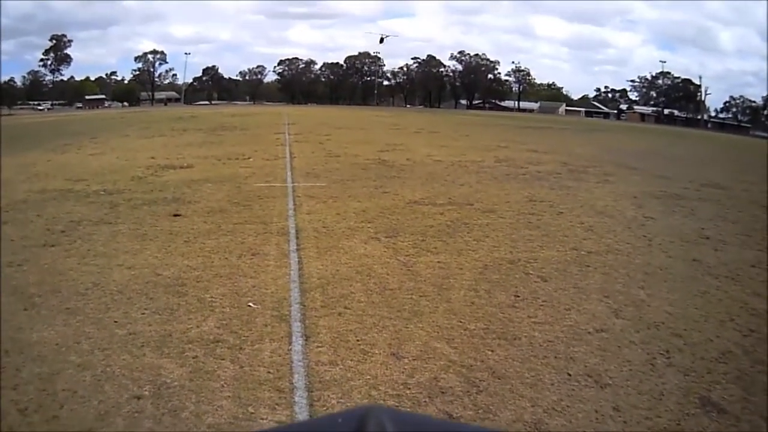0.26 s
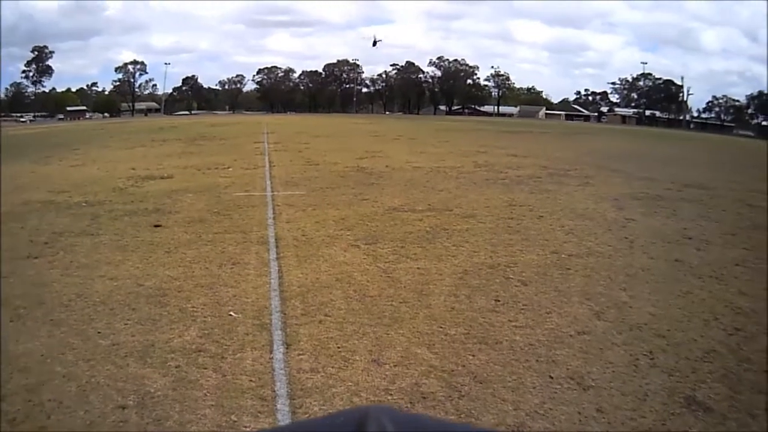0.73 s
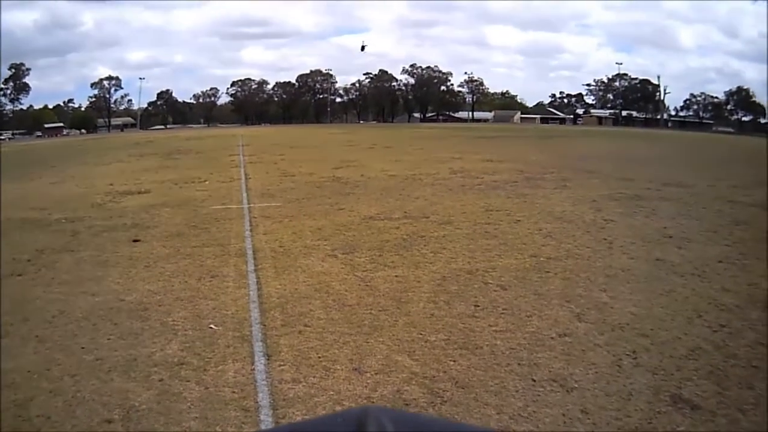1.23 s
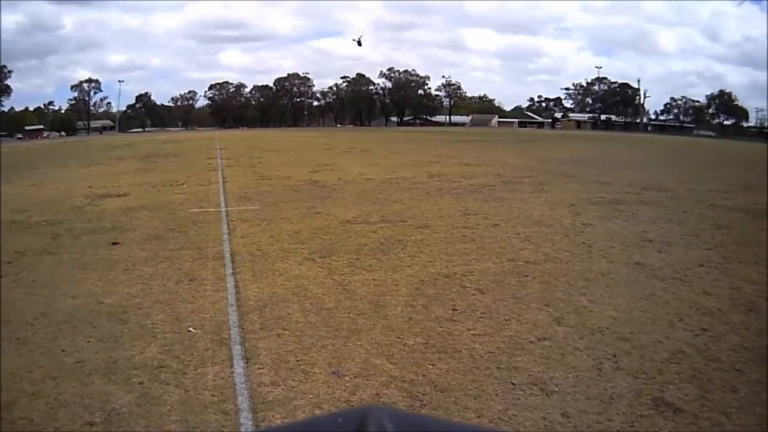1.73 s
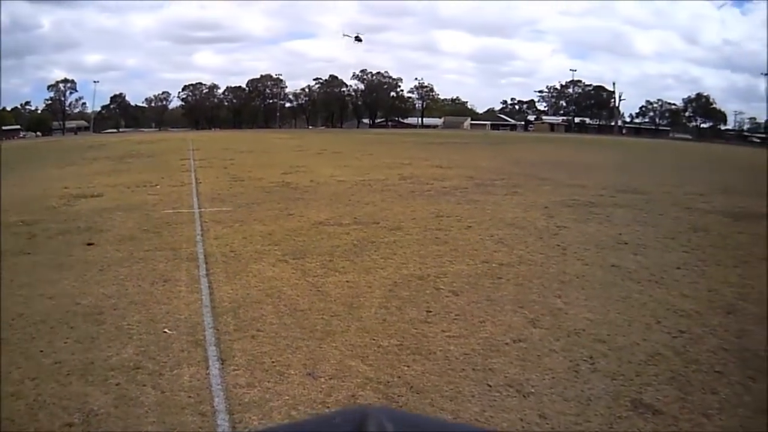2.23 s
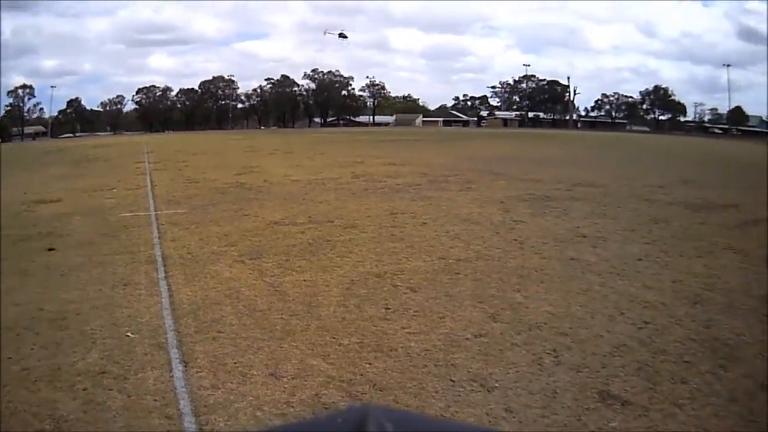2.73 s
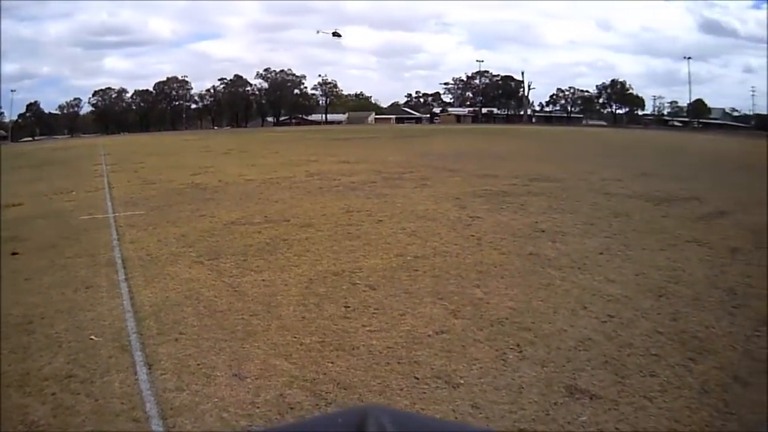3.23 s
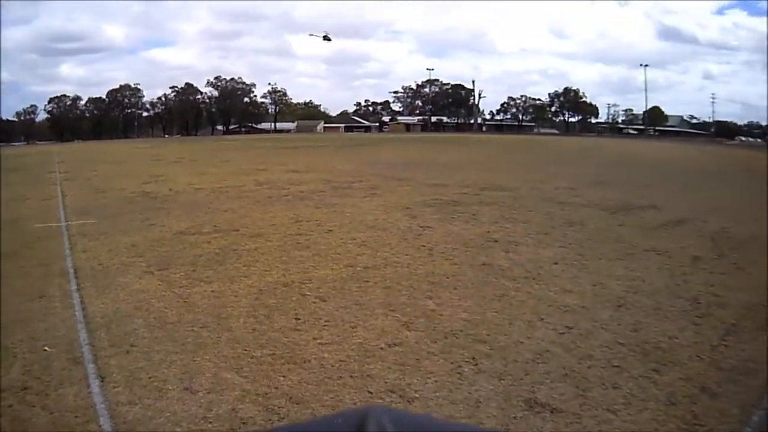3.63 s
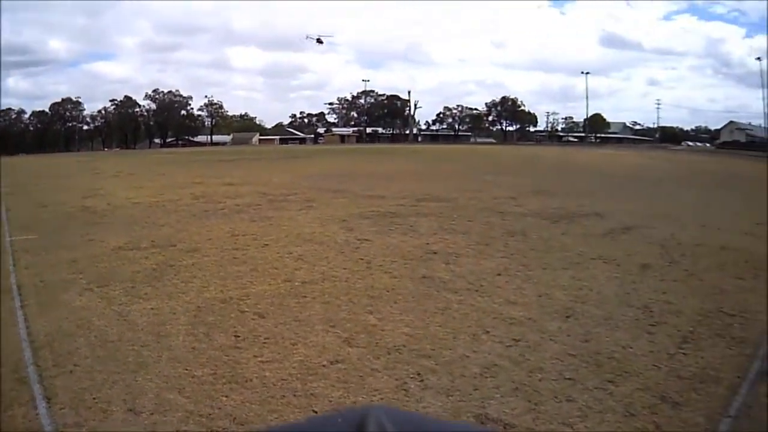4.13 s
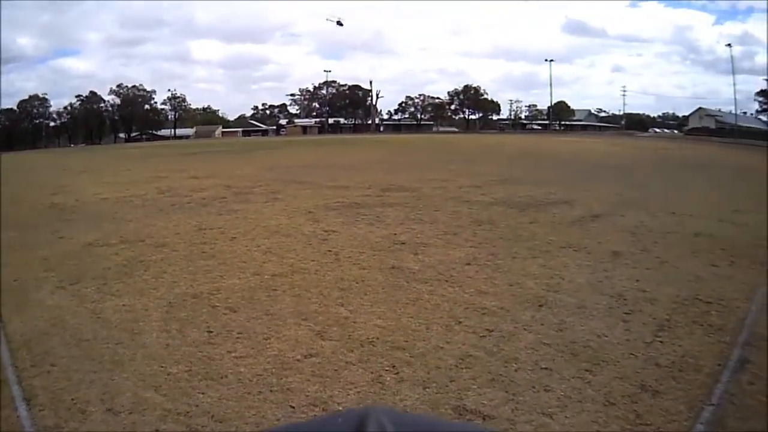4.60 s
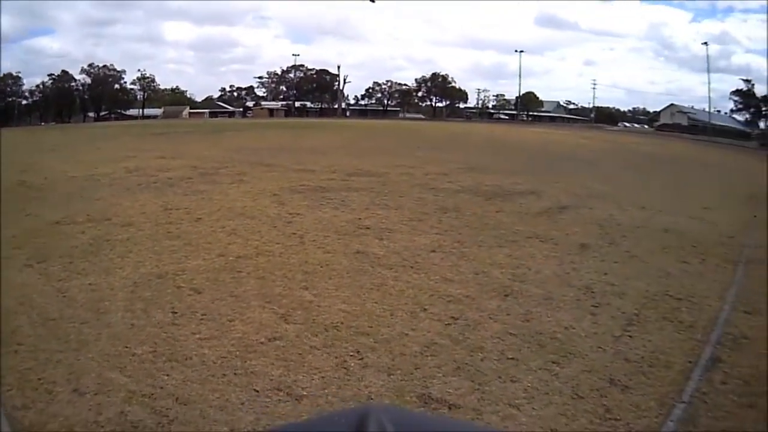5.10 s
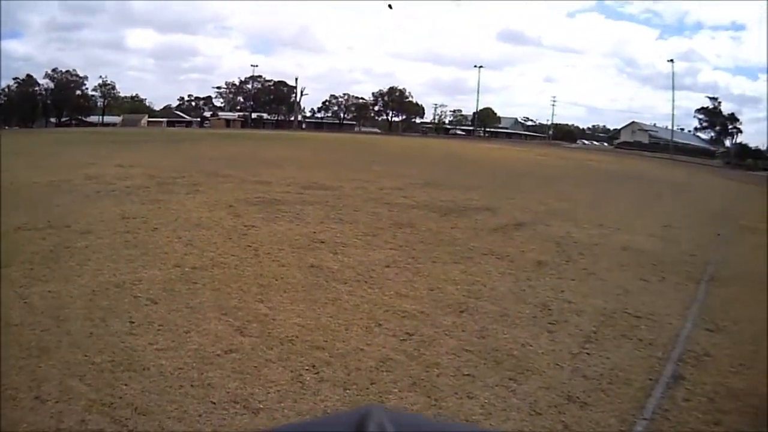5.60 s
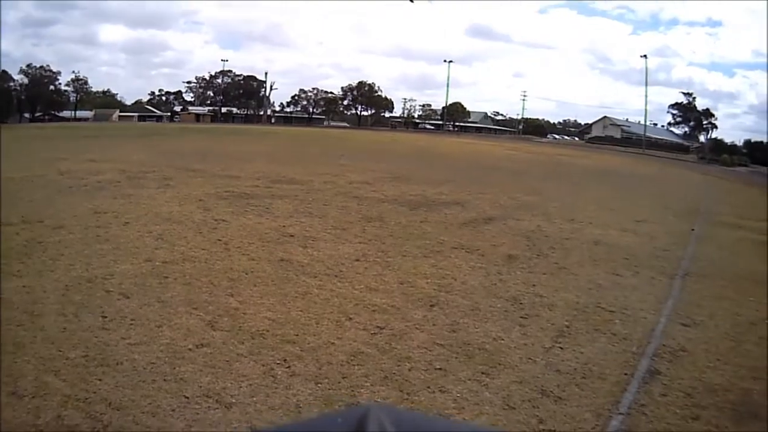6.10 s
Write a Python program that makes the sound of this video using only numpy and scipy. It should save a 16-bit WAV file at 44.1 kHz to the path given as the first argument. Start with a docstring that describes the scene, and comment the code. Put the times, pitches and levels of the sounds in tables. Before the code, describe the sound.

Close model helicopter drive whining high and gritty with a fast flutter, under heavy low wind thumps that thin out toward the end.

```python
"""Model helicopter over an open field

Gusts buffet the microphone: bands of noise follow the gusts, which differ in strength and brightness.
A small geared electric drive whines and rasps: tones and noise follow the phase of a shaft that turns
about seventeen times a second, and the noise swells once a turn. Two blades add pulses of hiss at each turn.
Behind them lie the rotor's swish, a noise band of wandering centre, and the soft rush of the field."""
import sys
import numpy as np
from scipy import signal
from scipy.fft import rfft, irfft, next_fast_len
from scipy.io import wavfile
from scipy.ndimage import uniform_filter1d

SR = 44100
rng = np.random.default_rng(int(sys.argv[2]) if len(sys.argv) > 2 else 0)


def output_pcm(signal):
    """Save a mono or channel-first signal as 16-bit PCM at the path in sys.argv[1].

    Samples are clipped to [-1, 1] before scaling.
    """
    pcm = np.clip(np.atleast_2d(signal).T, -1, 1) * 32767
    wavfile.write(sys.argv[1], SR, np.round(pcm).astype(np.int16))


N = 280035

# Open air. Each row: time in seconds, relative level in dB.
AIR_LEVEL = [(0.0, -45.5), (0.6, -46.5), (1.5, -41), (2.4, -43), (3.2, -40.5), (5.2, -40), (6.35, -43)]
# Colour of the open air. Each row: frequency in Hz, relative density in dB per Hz.
AIR_COLOUR = [(380, -14), (520, -2.5), (760, 0), (870, 2), (1100, -0.5), (1900, -0.5), (2400, -4),
              (2800, -9.5), (3100, -12), (3700, -12), (5000, -33)]

# Swish of the distant rotor. Each row: time in seconds, centre frequency in Hz, level in dB.
SWISH = [(0, 1500, -54), (1.3, 1241, -43), (1.8, 1485, -51), (2.3, 1936, -50), (3.3, 1800, -49),
         (4.0, 1728, -65), (4.8, 1158, -46), (5.6, 1080, -50), (6.35, 1193, -53)]

# Gusts on the microphone. Each row: start in seconds, hold in seconds, relative level in dB,
# brightness in dB per octave.
GUSTS = [(-0.07, 0.48, -24.5, -2.1), (0.53, 0.15, -27.5, -2), (0.757, 0.19, -23.5, -3),
         (1.05, 0.17, -29, -1.2), (1.213, 0.28, -27, -4), (1.738, 0.31, -27, -4), (2.138, 0.2, -22.5, -1.5),
         (2.462, 0.19, -29, -3), (2.908, 0.41, -23.5, -5.5), (3.466, 0.12, -25, -5.5),
         (3.643, 0.56, -21.5, -4.5), (4.227, 0.16, -30, -8), (4.79, 0.13, -27.5, -9.5),
         (5.055, 0.083, -26, -7.5), (5.292, 0.011, -28, -6), (5.382, 0.03, -37.5, -14.5),
         (5.567, 0.04, -33.5, -11.5), (5.755, 0.018, -33, -8)]
# Colour of the wind. Each row: frequency in Hz, density in dB per Hz against the level of the gust.
WIND_COLOUR = [(20, -13), (45, -19.5), (80, -20.5), (120, -19.5), (190, -21), (270, -22.5), (370, -24.5),
               (520, -30.5), (800, -37.5), (1200, -43.5), (2000, -50), (3000, -82)]
GUST_ATTACK_S, GUST_RELEASE_S = 0.063, 0.11
# The breeze between the gusts is weak and dull.
BREEZE_DB, BREEZE_DB_PER_OCTAVE = -40, -11.4
# Brightness tilts the wind about a pivot, between a low and a high corner.
TILT_LOW_HZ, TILT_PIVOT_HZ, TILT_HIGH_HZ = 61, 156.4, 375

# Spells in which the blades bite harder. Each row: start in seconds, hold in seconds, level in dB.
BITES = [(3.4, 1.15, -59)]
# Hiss of the blade tips. Each row: frequency in Hz, relative density in dB per Hz.
BLADE_HISS = [(9000, -2), (11000, 3), (12000, -3), (13800, 0), (15500, -9)]
BLADE_BASE_DB = -61.5
BLADE_PLACE, BLADE_WIDTH = -.13, 0.063   # place of the first blade and width of each pass, in turns

# Thin squeaks. Each row: centre in seconds, frequency in Hz, Gaussian spread in seconds, peak level in dB.
SQUEAKS = [(5.39, 5950, .006, -50), (5.42, 5980, 0.0052, -51), (5.458, 5900, 0.006, -42.5)]

# Rotation of the drive. Each row: time in seconds, speed in turns per second.
SPEED = [(0.0, 16.82), (0.85, 17.0), (1.67, 16.9), (2.15, 17.05), (3.0, 17.0), (3.6, 16.78), (4.0, 16.79),
         (4.34, 16.92), (5.1, 16.91), (5.9, 16.63), (6.35, 16.77)]
START_TURN = .13   # phase at the start, in turns
# Effort of the gear train. Each row: time in seconds, relative level of the rasp in dB.
EFFORT = [(0, -48.5), (1.0, -47.5), (1.5, -49), (2.05, -45), (2.7, -46.5), (3.25, -44), (3.8, -47.5),
          (4.75, -45), (5.5, -47), (6.35, -50.5)]
# Song of the main mesh. Each row: time in seconds, relative level in dB.
WHINE_LEVEL = [(0, -40), (1.0, -39), (1.8, -42), (2.03, -53), (2.55, -43), (2.95, -47), (3.5, -48),
               (3.75, -41), (4.7, -44), (5.15, -54), (6.35, -51)]
# Low hum of the turning parts. Each row: multiple of the turn, level in dB.
HUM = [(6, -33), (18.75, -48), (43.7, -59), (48.2, -60), (50, -55.5), (52.7, -62)]
# Catches of each turn. Each row: place in turns, width in turns, relative whine when light in dB,
# relative whine when loaded in dB, relative grind in dB.
CATCHES = [(-.36, 0.06, 5, -1, 3), (-.11, 0.061, 5, 6, 7), (.03, 0.045, -14, 2.5, 2),
           (.14, .055, 2, -15, -30), (.37, 0.031, -2, 7, 8)]
# Gear rasp through the housing. Each row: frequency in Hz, relative density in dB per Hz.
RASP_COLOUR = [(2300, -15), (2750, -11), (3050, -18), (3550, -20), (3750, -13), (4050, -2.5), (4300, -1),
               (4950, -3.5), (5220, -6.5), (5600, -1), (5950, -12), (6200, -14), (6500, -15), (6850, -10),
               (7500, -21)]
# Fine sizzle of the teeth. Each row: frequency in Hz, relative density in dB per Hz.
SIZZLE_COLOUR = [(7800, -5), (8200, -4), (8900, -4.5), (9700, -3), (10500, 4), (11000, 5), (11350, -8),
                 (11650, -22), (12600, -11), (13800, -9), (15500, -19)]
# Bright spit of each catch. Each row: frequency in Hz, relative density in dB per Hz.
SPIT_COLOUR = [(8100, 5.5), (8800, 1), (11000, 8), (11800, -2), (13200, -9), (15500, -18)]
# Spells of stronger sizzle. Each row: start in seconds, hold in seconds, relative level in dB.
FLARES = [(3.38, .05, -47), (3.64, .1, -46)]
# Spells in which the teeth grind. Each row: start in seconds, hold in seconds, relative level in dB.
GRINDS = [(2.0, .8, -53.5), (4.3, 0.95, -56.5), (5.9, .45, -63)]
# Tones of the grinding. Each row: multiple of the turn, relative level in dB.
GRIND_TONES = [(156, -1.5), (163, 3), (483, -6), (492, -4)]
# Tones of the squealing wheel. Each row: multiple of the turn, relative level in dB.
SQUEAL_TONES = [(226, -15), (234, -0.5), (253, -15), (259, -19), (283, -8)]
# Side tones of the train. Each row: multiple of the turn, mean level in dB against the effort.
SIDE_TONES = [(199, -14.5), (283, -20), (350, -16.5), (399, -16.5), (445, -24), (749, -25)]

MESH_TEETH = 324   # main-mesh cycles per turn
# The gears come under load and later run free again.
LOAD_START_S, LOAD_HOLD_S, LOAD_ATTACK_S, LOAD_RELEASE_S = 2.07, 2.1, .45, 0.51
THROB_FREE_DB, THROB_LOADED_DB = 1.5, 2.5   # swell of the rasp in each turn, up and down from the middle
# Relative level of the sizzle, which fades a little as the flight goes on.
SIZZLE_DB, SIZZLE_FADE_DB_PER_S = -46.5, 0.41
GRIND_BASE_DB = -61.5
SPELL_ATTACK_S, SPELL_RELEASE_S = 0.061, 0.049   # for sizzle, grinding and blades
# One wheel squeals for a while; the weak squeal around it follows the effort of the gears.
SQUEAL_START_S, SQUEAL_HOLD_S, SQUEAL_ATTACK_S, SQUEAL_RELEASE_S = 2.895, 0.29, 0.29, 0.38
SQUEAL_DB, SQUEAL_BASE_DB = -41.5, -56   # relative levels, the base at the greatest effort

# During the strongest gust the drive and the field dip briefly.
DIP_START_S, DIP_HOLD_S, DIP_EDGE_S = 3.88, 0.31, 0.098
DRIVE_DIP_DB, AIR_DIP_DB = -1.5, -5
CUTOFF_HZ = 15700


def from_db(db):
    """Amplitude grows tenfold for every 20 dB."""
    return np.exp(np.asarray(db) * np.log(10) / 20)


def rms_one(x):
    """Division by the root mean square normalizes the power."""
    return x / np.sqrt(np.mean(x ** 2) + 1e-20)


def in_time(rows):
    """Linear interpolation gives each column of a curve sample by sample."""
    seconds, *columns = np.transpose(rows)
    return [np.interp(np.arange(N) / SR, seconds, column) for column in columns]


def at_hz(points, hz):
    """A spectrum is interpolated in dB along a log-frequency axis."""
    known_hz, db = np.transpose(points)
    return np.interp(np.log(hz), np.log(known_hz), db)


def drift(rate_hz):
    """Low-pass noise: two equal poles leave a slow random motion of spread 1."""
    step = 40   # samples between computed points
    pole = np.exp(-2 * np.pi * rate_hz * step / SR)
    white = rng.standard_normal(N // step + 2002)
    slow = signal.lfilter([1], [1, -2 * pole, pole * pole], white)[2000:]   # settled part only
    return np.interp(np.arange(N) / step, np.arange(len(slow)), rms_one(slow))


def hiss(colour):
    """Spectral shaping: white noise takes a given colour and dies away beyond its ends; rms 1."""
    size = next_fast_len(N)
    hz = np.maximum(np.arange(size // 2 + 1) * SR / size, 1)
    low_skirt = np.minimum(hz / colour[0][0], 1) ** 8
    high_skirt = np.minimum(colour[-1][0] / hz, 1) ** 24
    spectrum = rfft(rng.standard_normal(size)) * from_db(at_hz(colour, hz))
    return rms_one(irfft(spectrum * low_skirt * high_skirt, size)[:N])


def envelope(start, hold, attack, release):
    """Exponential growth and decay: the gain swells to 1, holds and dies away."""
    t = np.arange(N) / SR
    before = np.maximum(start - t, 0)
    after = np.maximum(t - start - hold, 0)
    return np.exp(-before / attack - after / release)


def spells(rows, base_db):
    """Powers of independent sounds add: stronger spells lie on top of a base level."""
    power = from_db(base_db) ** 2
    for start, hold, db in rows:
        power = power + (from_db(db) * envelope(start, hold, SPELL_ATTACK_S, SPELL_RELEASE_S)) ** 2
    return np.sqrt(power)


def rotation():
    """Phase is the integral of speed: the turns per second and the turns made."""
    speed, = in_time(SPEED)
    return speed, START_TURN + np.cumsum(speed) / SR


def bump(turn, place, width):
    """Periodic contact: a brief Gaussian pulse at one place of every turn."""
    distance = (turn - place + .5) % 1 - .5
    return np.exp(-.5 * (distance / width) ** 2)


def swell(turn, depth_db):
    """Eccentricity: off-centre gears press hardest once a turn; rms about 1."""
    gain = from_db(depth_db * np.cos(2 * np.pi * turn))
    return gain / np.sqrt(np.i0(2 * np.log(from_db(depth_db))))


def evened(gain, speed):
    """A running mean of power keeps a pattern at rms 1 over every two turns or so."""
    two_turns = int(2 * SR / speed.mean())
    return gain / np.sqrt(uniform_filter1d(gain ** 2, two_turns) + 1e-12)


def tone(turn, multiple, jitter, jitter_rate):
    """Phase modulation: play in the teeth shakes a tone locked to the turn, jitter in radians; rms 1."""
    phase = 2 * np.pi * multiple * turn + jitter * drift(jitter_rate)
    return np.sqrt(2) * np.sin(phase)


def air(level_db=1.5):
    """Broadband ambience: the field is a soft rush of coloured noise that flickers slightly."""
    air_db, = in_time(AIR_LEVEL)
    return from_db(air_db + level_db + 1.38 * drift(36)) * hiss(AIR_COLOUR)


def rotor_swish(width_hz=130):
    """Quadrature modulation: the far blades are a band of noise whose centre wanders."""
    centre_hz, db = in_time(SWISH)
    angle = 2 * np.pi * np.cumsum(centre_hz) / SR
    return from_db(db) * (drift(width_hz) * np.cos(angle) + drift(width_hz) * np.sin(angle))


def wind(eddy_db=1.5, eddy_rate=25, patchy_db=1.5, steady_s=0.138):
    """Turbulence breaks on the microphone: the breeze only rumbles, gusts add smaller, brighter eddies."""
    gust_power = np.array([envelope(start, hold, GUST_ATTACK_S, GUST_RELEASE_S) ** 2
                           for start, hold, *_ in GUSTS])
    gust_db, brightness = np.transpose(GUSTS)[2:]
    edges = 14 * 2 ** np.arange(0, 8, .5)   # half-octave bands, in Hz
    white, eddies, out = rng.standard_normal((2, N + SR)), drift(eddy_rate), 0
    for k, (low, high) in enumerate(zip(edges, edges[1:])):
        hz = np.sqrt(low * high)
        band_filter = signal.butter(2, [low, high], "band", fs=SR, output="sos")
        band = signal.sosfilt(band_filter, white[k % 2])[SR:]
        # Evened power lets the breeze, gusts and lumps below set the slow level.
        band = band / np.sqrt(uniform_filter1d(band ** 2, int(steady_s * SR)) + 1e-12)
        octaves = np.log2(np.clip(hz, TILT_LOW_HZ, TILT_HIGH_HZ) / TILT_PIVOT_HZ)
        breeze = from_db(BREEZE_DB + BREEZE_DB_PER_OCTAVE * octaves) ** 2
        gusts = from_db(gust_db + brightness * octaves) ** 2 @ gust_power
        # Small eddies come in bursts.
        lumps_db = eddy_db * min(hz / 400, 1) * eddies + patchy_db * drift(15.0)
        strength = np.sqrt((breeze + gusts) * (high - low))
        out = out + band * strength * from_db(at_hz(WIND_COLOUR, hz) + lumps_db)
    return out


def blades(uneven_db=1.5, uneven_rate=60):
    """Amplitude modulation by passing: each of the two blades gives a short, uneven hiss once a turn."""
    _, turn = rotation()
    passes = bump(turn, BLADE_PLACE, BLADE_WIDTH) + bump(turn, BLADE_PLACE + .5, BLADE_WIDTH)
    pulses = rms_one(passes * from_db(uneven_db * drift(uneven_rate)))
    return spells(BITES, BLADE_BASE_DB) * pulses * hiss(BLADE_HISS)


def squeaks():
    """Short tone bursts: sines under Gaussian envelopes are heard as thin whistles."""
    t = np.arange(N) / SR
    out = 0
    for centre, hz, spread, db in SQUEAKS:
        burst = np.exp(-.5 * ((t - centre) / spread) ** 2)
        out = out + from_db(db) * burst * np.sqrt(2) * np.sin(2 * np.pi * hz * t)   # dB is rms at the peak
    return out


def gear_noise(turn, catching, rasp_db, sizzle_db, load):
    """Sliding friction: teeth rasp and sizzle with the swell of the turn and spit where they catch."""
    pressing = swell(turn, depth_db=THROB_FREE_DB + (THROB_LOADED_DB - THROB_FREE_DB) * load)
    spitting = rms_one(.3 + rms_one(catching))
    rasp = from_db(rasp_db + 2.5) * hiss(RASP_COLOUR) * pressing
    sizzle = from_db(sizzle_db - 3.0) * hiss(SIZZLE_COLOUR) * swell(turn, depth_db=1.0)
    spit = from_db(sizzle_db - 9.0) * hiss(SPIT_COLOUR) * spitting
    return rasp + sizzle + spit


def gear_grind(turn, catching):
    """Intermittent contact: each catch sets off short rough tones."""
    tones = sum(from_db(db) * tone(turn, multiple, jitter=0.71, jitter_rate=58)
                for multiple, db in GRIND_TONES)
    return spells(GRINDS, GRIND_BASE_DB) * rms_one(catching) * tones


def gear_squeal(turn, rasp_db, sizzle_db):
    """Frictional tones: one wheel squeals at the tight part of each turn, a tooth chirps, side tones ring."""
    spell = envelope(SQUEAL_START_S, SQUEAL_HOLD_S, SQUEAL_ATTACK_S, SQUEAL_RELEASE_S)
    base = from_db(SQUEAL_BASE_DB + rasp_db - rasp_db.max())
    squeal_size = np.hypot(from_db(SQUEAL_DB) * spell, base)
    squeal = sum(from_db(db) * tone(turn, multiple, jitter=0.28, jitter_rate=13)
                 for multiple, db in SQUEAL_TONES)
    side = sum(from_db(db + 2.0 * drift(1.9)) * tone(turn, multiple, jitter=0.85, jitter_rate=28)
               for multiple, db in SIDE_TONES)
    touch = rms_one(bump(turn, place=.03, width=.032) + .08)
    chirp_size = from_db(sizzle_db - 8.5 + 1.4 * drift(3))
    chirp = chirp_size * tone(turn, 2 * MESH_TEETH, jitter=1.0, jitter_rate=59) * touch
    return squeal_size * squeal * swell(turn, depth_db=14.0) + from_db(rasp_db) * side + chirp


def gear_whine(turn, speed, contacts, load, held=1.0):
    """Tooth-mesh tone: it sings almost without a break; load splits it into a long and a short pulse."""
    whine_db, = in_time(WHINE_LEVEL)
    light_db, loaded_db = np.transpose(CATCHES)[2:4]
    split = np.clip(0.39 + 0.72 * load, 0, 1)
    light = held + from_db(light_db) @ contacts
    loaded = from_db(loaded_db) @ contacts
    pulses = (1 - split) * light + split * loaded
    mesh = tone(turn, MESH_TEETH, jitter=0.96, jitter_rate=26)
    return from_db(whine_db - 3.0) * mesh * evened(pulses, speed)


def drive():
    """Rotational synchronism: the tones and pulses of the gear train are locked to its turn."""
    speed, turn = rotation()
    rasp_db, = in_time(EFFORT)
    load = envelope(LOAD_START_S, LOAD_HOLD_S, LOAD_ATTACK_S, LOAD_RELEASE_S)
    fading_db = SIZZLE_DB - SIZZLE_FADE_DB_PER_S * np.arange(N) / SR
    sizzle_db = 20 * np.log10(spells(FLARES, fading_db))
    contacts = np.array([bump(turn, place, width) for place, width, *_ in CATCHES])
    grind_db = np.transpose(CATCHES)[-1]
    catching = from_db(2.1 * drift(9.8)) * (from_db(grind_db) @ contacts)
    hum = sum(from_db(db) * tone(turn, multiple, jitter=0.27, jitter_rate=3.3) for multiple, db in HUM)
    gears = (gear_noise(turn, catching, rasp_db, sizzle_db, load)
             + gear_whine(turn, speed, contacts, load)
             + gear_squeal(turn, rasp_db, sizzle_db)
             + gear_grind(turn, catching))
    return from_db(1.06 * drift(8.1)) * gears + hum   # no two turns are equally loud


def scene():
    """Superposition: field, far rotor, wind, blades, squeaks and drive add at the microphone."""
    dip = envelope(DIP_START_S, DIP_HOLD_S, DIP_EDGE_S, DIP_EDGE_S)
    field = from_db(AIR_DIP_DB * dip) * air()
    machine = from_db(DRIVE_DIP_DB * dip) * drive()
    return (field + rotor_swish() + wind() + blades() + squeaks() + machine)[None]


def record(dry):
    """Saturation and low-pass filtering: the strongest peaks are rounded off and the top is cut."""
    rounded = 1.22 * np.tanh(dry / 1.212)
    low_pass = signal.ellip(10, .1, 80, CUTOFF_HZ, fs=SR, output="sos")
    return signal.sosfilt(low_pass, rounded)


dry = scene()
out = record(dry)
output_pcm(out)
```